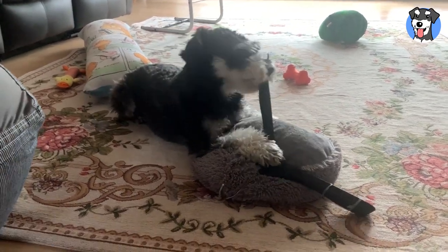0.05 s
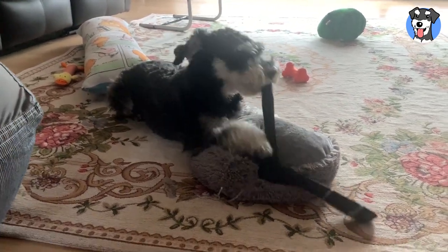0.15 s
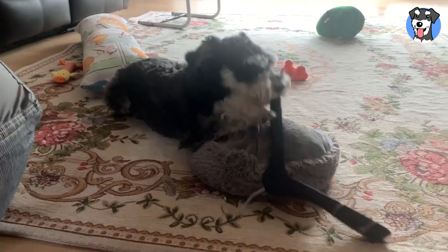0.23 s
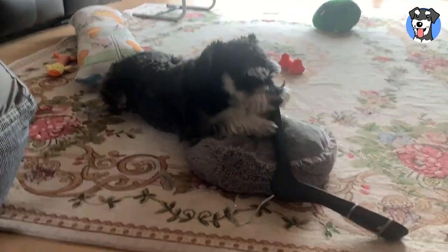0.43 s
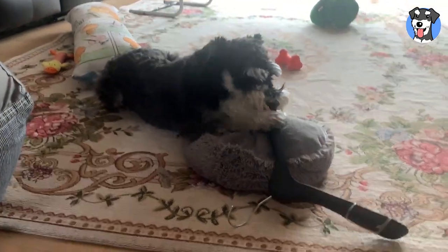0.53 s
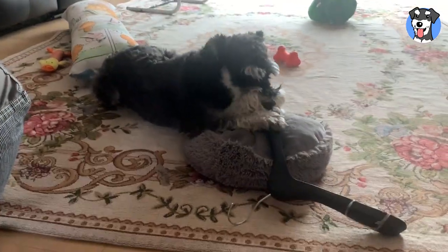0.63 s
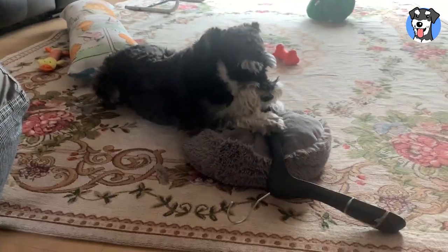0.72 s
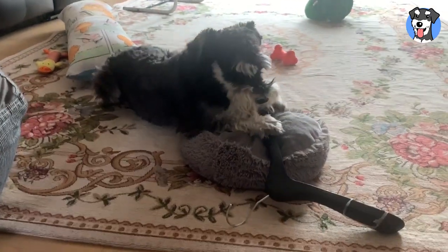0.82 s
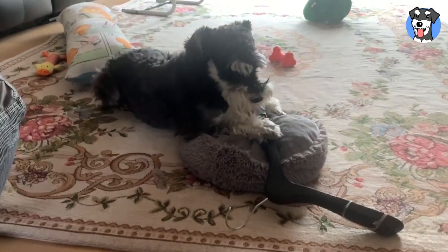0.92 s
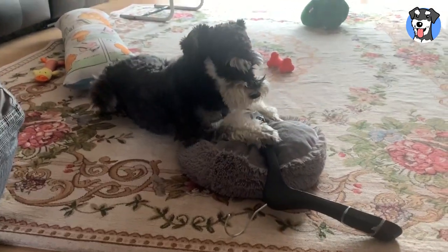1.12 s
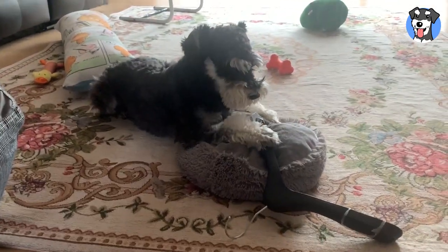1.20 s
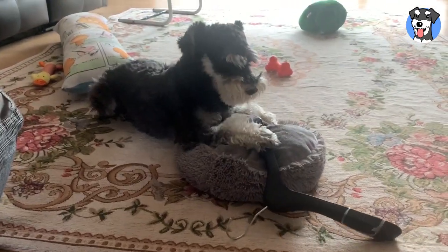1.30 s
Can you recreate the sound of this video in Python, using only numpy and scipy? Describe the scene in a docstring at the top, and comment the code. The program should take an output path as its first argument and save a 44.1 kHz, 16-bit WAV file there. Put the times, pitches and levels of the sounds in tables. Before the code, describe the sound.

A dog's teeth crunch briefly on a plastic hanger, then slip off in several sharp clacks a little right of the microphone. Paws thump softly on a cushion and fur rustles faintly over a quiet room's low rumble.

```python
"""Fur rustles faintly on a cushion over the low rumble of a quiet living room: a little to the right,
a dog is gnawing a plastic hanger. Its teeth scrape in short stick-slip crunches, then slip off in sharp
clacks that excite the hanger's modes. Its paws and the shifting hanger thump softly on the cushion.
The furniture returns early reflections, and the room a short diffuse reverberation."""
import sys
import numpy as np
from scipy import signal
from scipy.fft import rfft, irfft, next_fast_len
from scipy.io import wavfile
from scipy.ndimage import map_coordinates

SR = 44100
rng = np.random.default_rng(int(sys.argv[2]) if len(sys.argv) > 2 else 0)


def master(y):
    """Save y as 16-bit WAV."""
    cut = np.clip(np.atleast_2d(y).T, -1, 1)
    pcm = np.round(cut * 32767)  # scale
    wavfile.write(sys.argv[1], SR, pcm.astype(np.int16))


N = 59535

BACKGROUND_SPECTRUM = [(20, -31), (45, -3), (75, -0.5), (120, -2.5), (200, -16), (400, -17.5), (800, -28),
                       (1600, -26), (3000, -34), (8000, -32), (11000, -43.5), (16000, -43)]  # the room's steady noise: f/Hz, level/dB
FUR_SPECTRUM = [(100, 3.5), (400, -5.5), (900, -5.5), (2000, -14.5), (6000, -20.5), (15000, -40)]  # rubbing on the cushion: f/Hz, level/dB
FIDGETING = [(0, 8), (.13, 3.5), (.4, 5.5), (.75, 3.5), (.95, 3.5), (1.08, -11.5), (1.24, -6.5), (1.35, -1)]  # course of that rubbing: t/s, level/dB
# Teeth scraping: t/s, level/dB, rise/s, hold/s, fade/s, treble before weighting/dB, left lag/s, room/dB,
# hollow f/Hz, hollow lift/dB, hanger ring/dB, squeak f/Hz, ping f/Hz, ping lift/dB
TOOTH_SCRAPES = [(0.157, -55.5, 0.0036, 0.014, 0.004, -6, -.00005, 8, 2900, 4.5, -11, 1410, 1150, 6),
                 (0.1749, -41, 0.0042, 0.0026, 0.0044, -11, -.00005, 8.5, 2920, 15.5, -14.5, 1460, 1230, 6.5),
                 (0.202, -38, 0.0014, 0.0047, 0.0022, -2, -.00005, -2.5, 3297, 3.5, -23, 6200, 1450, 8),
                 (0.21, -27.5, 0.005, 0.0042, 0.004, 3, -.00005, 3, 2804, 16.5, -27, 6240, 2170, 9.5),
                 (0.253, -28.5, 0.003, 0.0041, 0.0096, -6, .00022, 1.5, 4800, 12.5, -9, 8460, 3360, 5.5),
                 (0.481, -41.5, 0.0041, 0.015, 0.0031, 1, .00022, 5, 2845, 13.5, -12.5, 8890, 1950, 0),
                 (1.32, -65, 0.0067, 0.0072, 0.018, -11, -.00005, 8, 1630, 14, -18.5, 790, 4700, 8.5)]
SCRAPE_SPECTRUM = [(150, -28), (600, -25), (1000, -12), (1600, -9), (2200, -5), (2700, -7), (3600, -6.5),
                   (4800, -4), (7000, -2.5), (8900, 4), (10500, 2), (11800, -13), (13500, 0),
                   (16000, -22.5)]  # friction of tooth on plastic: f/Hz, level/dB
HANGER_MODES = [(835, -14.5, 0.04), (1280, -15.5, 0.056), (1592, 0, 0.057), (1674, -1, 0.105),
                (1798, -1, 0.057), (1893, 0, 0.058), (2096, -4, 0.048), (2387, 7, 0.013), (2910, 2, 0.025),
                (3330, -3.5, 0.025), (3940, -17.5, 0.017), (4594, 0, 0.046), (5920, -2, 0.02),
                (8240, 0, 0.019)]  # free vibrations of the hanger: f/Hz, level/dB, T60/s
CUSHION_BLOWS = [(0.202, -53.5, 153), (0.238, -59, 89.5), (0.409, -39, 84.6), (0.435, -43.5, 96.7),
                 (0.46, -44.5, 69), (0.946, -36.5, 81.1), (0.975, -40, 98), (1.003, -46.5, 101),
                 (1.023, -45, 106)]  # soft blows on the cushion: t/s, level/dB, f/Hz
# Teeth snapping off: t/s, level/dB, slip time/s, tick f/Hz, hanger ring/dB, knock/dB, knock f/Hz,
# hollow f/Hz, hollow lift/dB, presence lift/dB, mode frequency ratio, ping f/Hz, ping lift/dB
TOOTH_SNAPS = [(0.4768, -14, 0.001, 9240, -4, -20.5, 701, 2790, 13.5, 1, 1.1, 2750, 7),
               (0.4983, -15, 0.00112, 8200, -13.5, -28.5, 796, 2856, 23, 5, 1.01, 2730, 7.5),
               (0.5749, 1, 0.000087, 7650, -2.5, -24.5, 860, 2386, 5, -12, 1, 4600, 5.5),
               (.5800, -2, 0.00051, 9010, -9.5, -24.5, 1010, 3055, 13.5, 11, 1, 5400, -0.5),
               (0.6596, -12, 0.0013, 8840, 1, -20, 850, 2850, 3, -7.5, 1, 7300, 2),
               (0.6647, -18, 0.00064, 7600, -2, -5, 261, 2840, 7, -5.5, 0.97, 3950, 1.5),
               (0.7250, -1, 0.00064, 9830, -13.5, -19, 850, 4800, -0.5, 3.5, .95, 3880, 8),
               (0.7382, -20.5, 0.0014, 9450, -12.5, -8.5, 201, 4300, 18, 10.5, 1.15, 5100, 5.5),
               (1.1023, -46, 0.0005, 7760, 4.5, 6, 523, 986, -4, 2, 0.93, 4410, 4)]
SNAP_SPECTRUM = [(200, -47.5), (650, -27), (1500, -5), (3000, -3.5), (5000, -6), (7000, 0.5), (10500, -2.5),
                 (11800, -7.5), (13500, 0.5), (16000, -18.5)]  # a tooth's bright tick: f/Hz, level/dB
KNOCK_SPECTRUM = [(60, -1), (150, 4), (300, 2.5), (550, 1), (850, 5), (1300, -13.5), (4000, -46)]  # the dull knock under it: f/Hz, level/dB
REVERB_TIME = [(100, 0.11), (500, 0.36), (1500, 0.55), (4000, 0.49), (9000, 0.35), (15000, 0.26)]  # decay of the room: f/Hz, T60/s
REVERB_SPECTRUM = [(100, 17), (600, 1), (1700, -0.5), (4500, 1.5), (9000, -9.5), (15000, -10)]  # colour of the reverberation: f/Hz, level/dB
COHERENCE = [(100, 0.45), (300, 0.55), (700, 0.35), (2000, 0.018), (6000, 0.05)]  # likeness of left and right in the diffuse field: f/Hz, correlation

LEFT_LAG_S = 0.0002198  # sound from the right reaches the left microphone later


def amp(db):
    """Amplitude ratio of a level in decibels."""
    return 10 ** (np.asarray(db) / 20)


def unit(x):
    """Normalisation to rms 1."""
    return x / np.sqrt(np.mean(x ** 2) + 1e-20)


def along(points, hz):
    """Interpolation of (f/Hz, value) points on a logarithmic frequency axis."""
    f, v = np.transpose(points)
    return np.interp(np.log(hz + 1), np.log(f + 1), v)


def filtered(x, response):
    """Linear filtering: the spectrum of x times a complex frequency response."""
    n = x.shape[-1]
    m = next_fast_len(n + 8192)
    return irfft(rfft(x, m) * response(np.fft.rfftfreq(m, 1 / SR)), m)[..., :n]


def coloured(x, curve, size=4096):
    """Minimum-phase filtering: folding the cepstrum of a dB curve gives a causal response."""
    cepstrum = irfft(np.log(amp(curve(np.fft.rfftfreq(size, 1 / SR))) + 1e-6))
    cepstrum[1:size // 2] *= 2
    cepstrum[size // 2 + 1:] = 0
    return signal.fftconvolve(x, irfft(np.exp(rfft(cepstrum))))[:len(x)]


def resonance(hz, centre_hz, lift_db, width=0.15):
    """A resonance peak in dB, bell-shaped in log frequency, of the given relative half width."""
    return lift_db / (1 + (np.log((hz + 1) / centre_hz) / width) ** 2)


def add(track, s, x):
    """Superposition of x on the track from time s."""
    part = track[..., max(0, round(s * SR)):]
    part[..., :x.shape[-1]] += x[..., :part.shape[-1]]


def diffuse(size):
    """Noise of a diffuse field: partly coherent at two points in the bass, unrelated in the treble."""
    angle = lambda hz: np.arccos(np.clip(along(COHERENCE, hz), -1, 1)) / 2
    weights = lambda hz: np.array([np.cos(angle(hz)), np.sin(angle(hz))])
    mid, side = filtered(rng.standard_normal((2, size)), weights)
    return np.array([mid + side, mid - side])


def diffuse_noise(spectrum):
    """Diffuse noise filtered to a given spectral shape, at rms 1."""
    return unit(filtered(diffuse(N), lambda hz: amp(along(spectrum, hz))))


def background(level_db=-64.5):
    """Stationary noise: the room's low rumble, slightly stronger on the right."""
    return amp(level_db) * diffuse_noise(BACKGROUND_SPECTRUM) * amp([[-.8], [.8]])


def fur(base_db=-73, flutter_hz=70, flutter_db=2, snags_per_s=45, snag_db=-2.5):
    """Friction noise: fur and cloth rub unevenly and snag now and then as the dog fidgets."""
    t = np.arange(N) / SR
    flutter = map_coordinates(rng.standard_normal(N // 100), [t * flutter_hz], mode="mirror")
    snags = (rng.random(N) < snags_per_s / SR) * rng.uniform(-1, 1, N)
    snags = unit(coloured(snags, lambda hz: along(FUR_SPECTRUM, hz)))
    rubbing = diffuse_noise(FUR_SPECTRUM) * amp(flutter_db * flutter)
    return amp(base_db + np.interp(t, *np.transpose(FIDGETING))) * (rubbing + amp(snag_db) * snags)


def scrapes(slips_per_s=2200, squeak_db=4, echo_trim_db=-5):
    """Stick-slip friction: dense tiny slips of the teeth swell, fade and drive the hanger's modes."""
    out, t = np.zeros((2, N)), np.arange(SR * 3 // 4) / SR
    for (s, db, rise_s, hold_s, fade_s, treble_db, lag_s, room_db,
         hollow_hz, hollow_db, ring_db, squeak_hz, ping_hz, ping_db) in TOOTH_SCRAPES:
        slips = (rng.random(len(t)) < slips_per_s / SR) * rng.choice([-1, 1], len(t))
        slips = slips + 0.19 * rng.standard_normal(len(t))
        press = np.minimum(t / rise_s, 1) ** 2 * np.exp(-np.maximum(t - rise_s - hold_s, 0) / fade_s)
        force = slips * press
        grit = coloured(force, lambda hz: along(SCRAPE_SPECTRUM, hz)
                        + resonance(hz, squeak_hz, squeak_db)  # the tooth chatters in this band
                        + treble_db * along([(2800, 0.26), (5000, 0.8)], hz))
        contact = jaws(grit, hollow_hz, hollow_db, ping_hz, ping_db)
        ring = signal.fftconvolve(force, hanger_ring(t))[:len(t)]
        rub, to_room = np.linalg.norm(press) * (contact + amp(ring_db) * ring / np.linalg.norm(ring))
        near = direct_path(rub, lag_s) + amp(echo_trim_db) * furniture(rub)
        add(out, s, amp(db) * (near + amp(room_db) * room(to_room)))
    return out


def jaws(x, hollow_hz, hollow_db, ping_hz, ping_db, room_share=0.13):
    """Two resonances colour a contact: the gripped plastic's ping, the hollow between it and the jaws."""
    pinged = coloured(x, lambda hz: resonance(hz, ping_hz, ping_db, width=0.036))
    direct = coloured(pinged, lambda hz: resonance(hz, hollow_hz, hollow_db))
    to_room = coloured(pinged, lambda hz: resonance(hz, hollow_hz, room_share * hollow_db))
    return np.array([direct, to_room]) / np.linalg.norm(direct)


def hanger_ring(t, tuning=1):
    """Impulse response of energy 1: damped modes of alternating sign, their pitch shifted by the grip."""
    ring = np.zeros(len(t))
    for k, (hz, db, t60) in enumerate(HANGER_MODES):
        envelope = amp(db + rng.normal(0, 1)) * np.exp(-np.log(1000) * t / t60)
        ring += (-1) ** k * envelope * np.cos(2 * np.pi * hz * tuning * t)
    return ring / np.linalg.norm(ring)


def direct_path(x, lag_s=LEFT_LAG_S):
    """Path difference: the left microphone receives the wave lag_s after the right."""
    return filtered(x, lambda hz: np.exp(-2j * np.pi * hz * np.array([[lag_s], [0]])))


def furniture(x, delay_s=0.0099, spread_s=0.0035, level_db=-14.5):
    """Scattering: furniture behind the dog returns a cluster of early reflections."""
    t = np.arange(SR // 20) / SR
    cluster = rng.standard_normal(len(t)) * np.exp(-((t - delay_s) / spread_s) ** 2 / 2)
    echoes = signal.fftconvolve(x, cluster / np.linalg.norm(cluster))[:len(x)]
    return amp(level_db) * direct_path(echoes)


def room(x, build_s=0.00072):
    """Reverberation: a fresh diffuse tail decays exponentially, lasting longest in the midrange."""
    hz, t, bands = signal.stft(diffuse(len(x)), SR, nperseg=256)
    decay = amp(-60 * t / along(REVERB_TIME, hz)[:, None])
    tail = signal.istft(bands * decay, SR, nperseg=256)[1]
    tail *= 1 - np.exp(-(np.arange(tail.shape[1]) / SR / build_s) ** 2)
    source = coloured(x, lambda f: along(REVERB_SPECTRUM, f))
    return signal.fftconvolve(source[None], tail / np.linalg.norm(tail[0]), axes=1)[:, :len(x)]


def thumps(rise_s=0.015, fade_s=0.0072):
    """Heavy damping: a blow of paw or hanger on the cushion swings for only a few low cycles."""
    out, t = np.zeros(N), np.arange(SR // 2) / SR
    for s, db, hz in CUSHION_BLOWS:
        swell = np.minimum(t / rise_s, 1) * np.exp(-np.maximum(t - rise_s, 0) / fade_s)
        add(out, s, amp(db) * swell * np.sin(2 * np.pi * hz * t))
    return out * amp([[-1.2], [1.2]])


def clacks(lead_s=0.005, roughness=0.3, tick_db=8.5, tick_width_hz=1260):
    """Impulsive excitation: a tooth slips ever harder and snaps off with a tick, a ring and a knock."""
    snap_room_db, body_room_db, body_direct_db = -3.5, -7.5, -6.5
    presence_hz = 4800  # the band that a hard, square bite brings out
    out, t = np.zeros((2, N)), np.arange(SR * 3 // 4) / SR
    lead = round(lead_s * SR)
    for (s, db, slip_s, tick_hz, ring_db, knock_db, knock_hz,
         hollow_hz, hollow_db, presence_db, tuning, ping_hz, ping_db) in TOOTH_SNAPS:
        force = roughness * rng.standard_normal(len(t)) * np.exp(-np.abs(t - t[lead]) / slip_s)
        force[lead] += 1  # the instant of release
        tick = coloured(force, lambda hz: along(SNAP_SPECTRUM, hz)
                        + resonance(hz, presence_hz, presence_db, width=0.38)
                        + tick_db / (1 + ((hz - tick_hz) / tick_width_hz) ** 2))
        snap, to_room = jaws(tick, hollow_hz, hollow_db, ping_hz, ping_db)
        knock = coloured(1. * (t == 0), lambda hz: along(KNOCK_SPECTRUM, hz)
                         + resonance(hz, knock_hz, lift_db=6.5))
        body = amp(ring_db) * hanger_ring(t, tuning) + amp(knock_db) * knock / np.linalg.norm(knock)
        body = np.pad(body, (lead, 0))[:len(t)]
        direct = direct_path(snap) + amp(body_direct_db) * direct_path(body, lag_s=.00007)
        echoes = furniture(snap + body)
        reverb = room(amp(snap_room_db) * to_room + amp(body_room_db) * body)
        add(out, s - lead_s, amp(db) * (direct + echoes + reverb))
    return out


def scene():
    """Superposition of the gnawing dog and the room's low background."""
    return clacks() + scrapes() + thumps() + fur() + background()


def record(dry, top_hz=16600):
    """Band limiting: the recorder cuts off steeply above top_hz."""
    return filtered(dry, lambda hz: 1 / (1 + (hz / top_hz) ** 120))


dry = scene()
out = record(dry)
master(out)
```